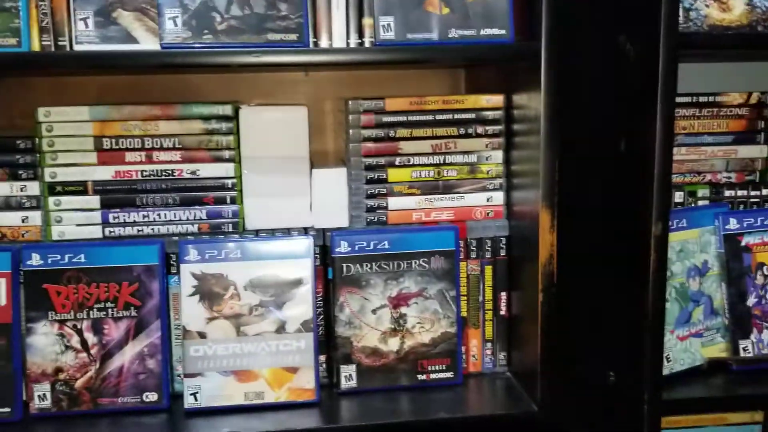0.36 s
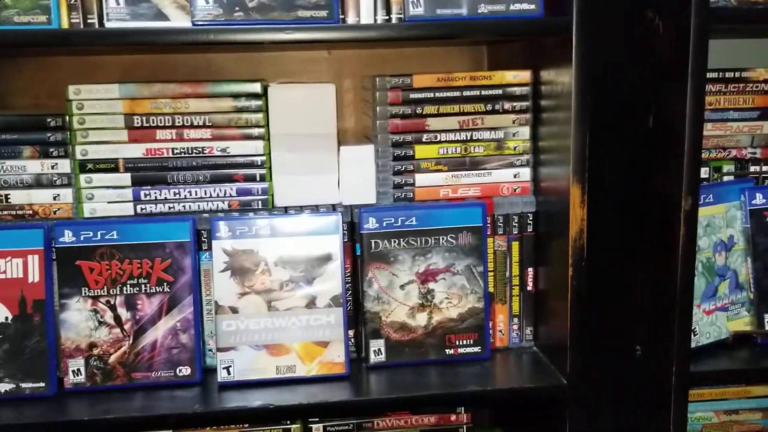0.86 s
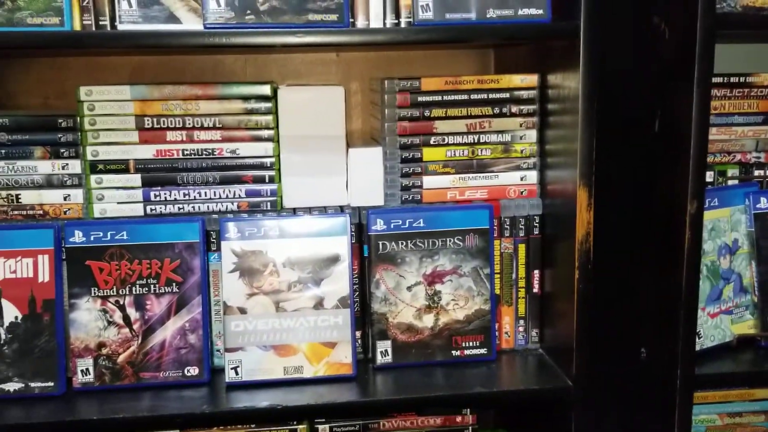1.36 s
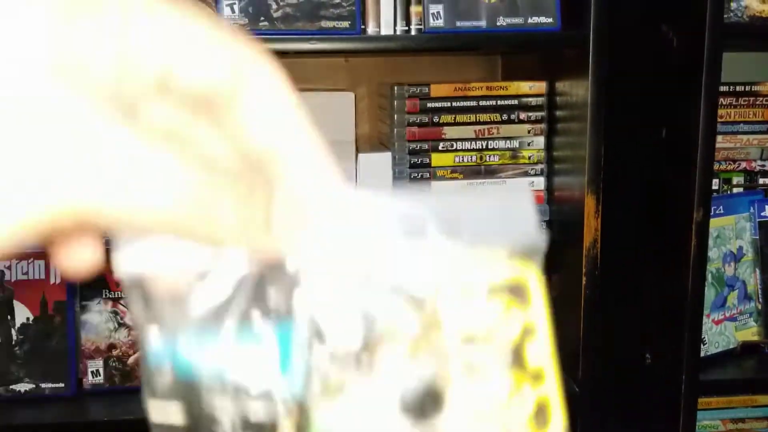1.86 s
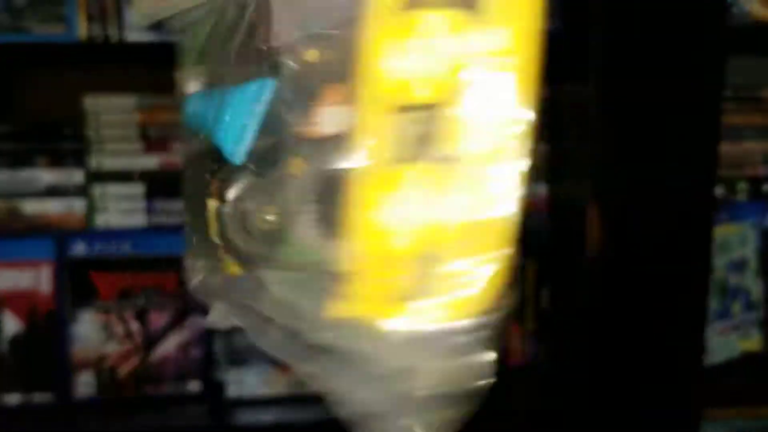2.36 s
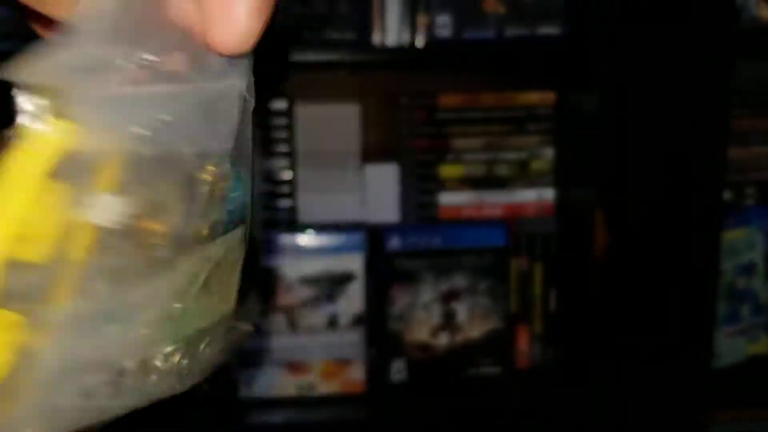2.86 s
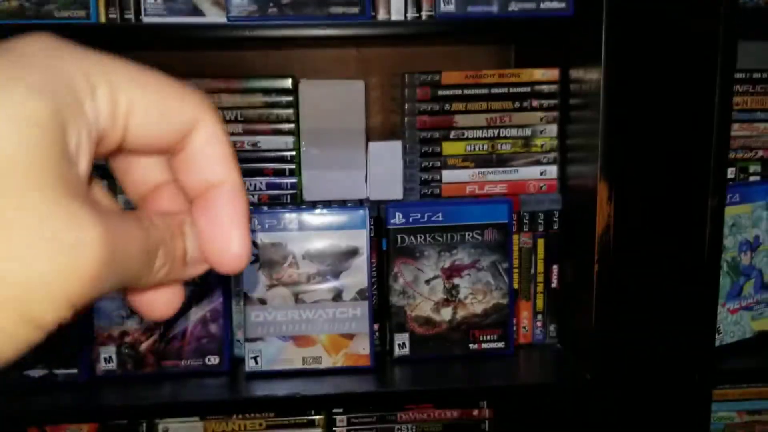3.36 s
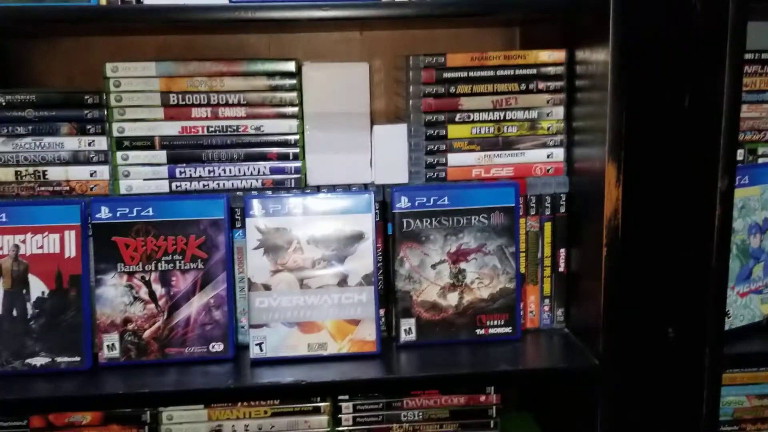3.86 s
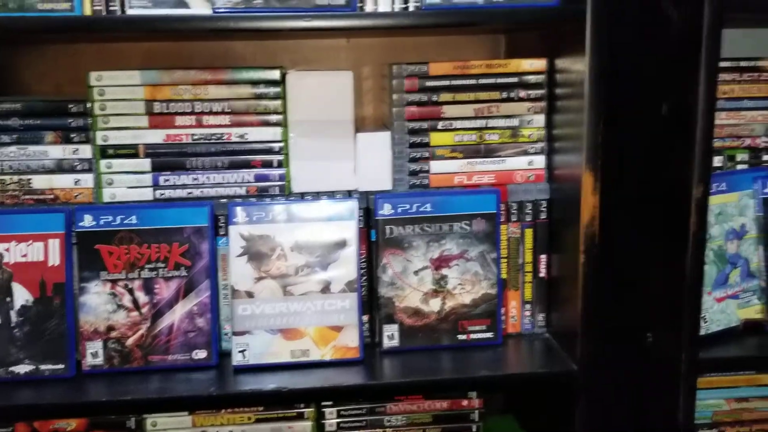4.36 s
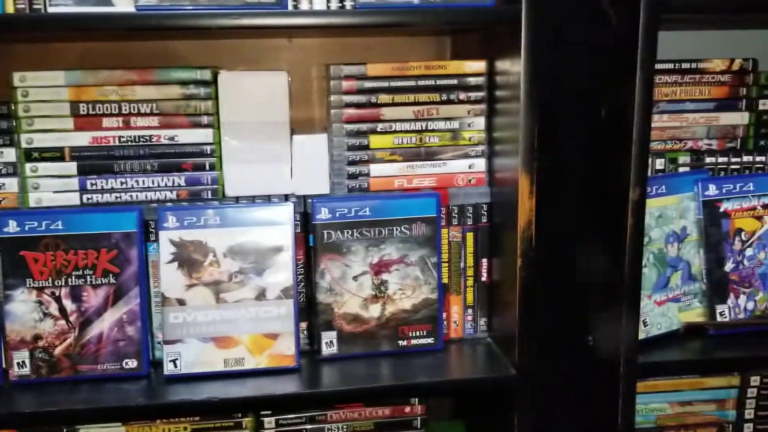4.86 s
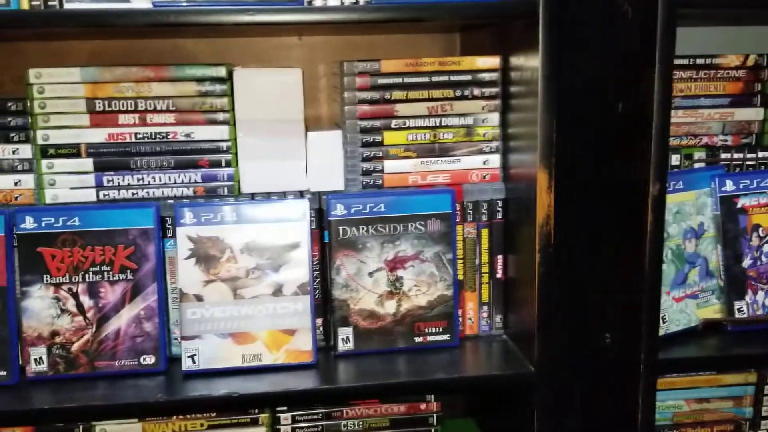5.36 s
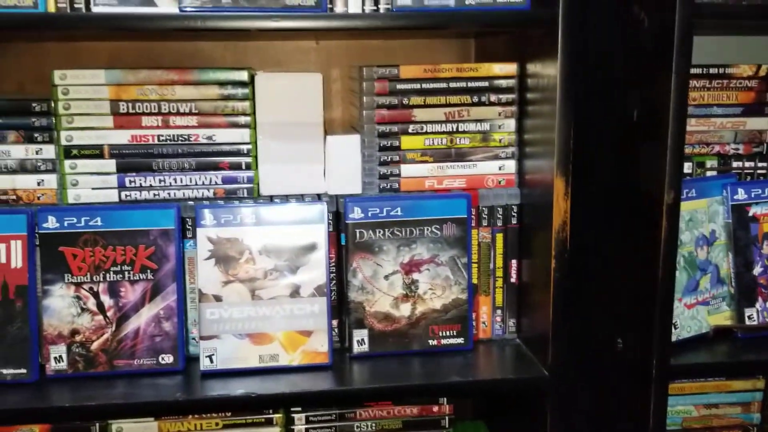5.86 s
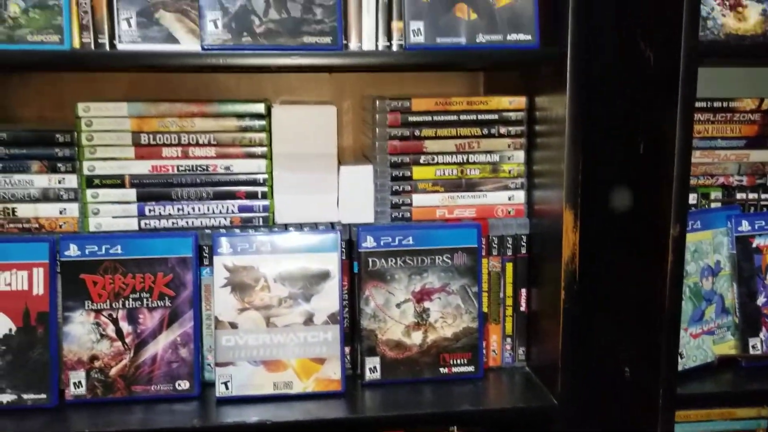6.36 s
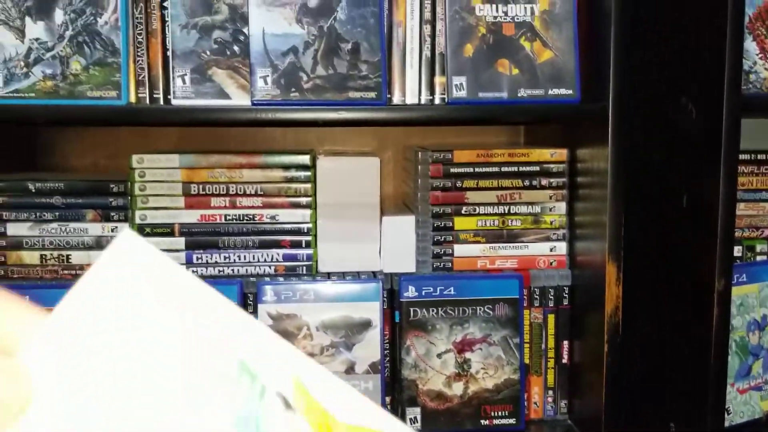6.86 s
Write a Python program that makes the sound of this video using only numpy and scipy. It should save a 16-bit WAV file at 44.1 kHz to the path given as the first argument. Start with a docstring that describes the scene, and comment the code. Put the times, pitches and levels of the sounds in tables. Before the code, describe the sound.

Close stereo pickup in a quiet, slightly live room with low rumble and faint hiss. A plastic bag of small hard parts lands with a crunch, then fingers crease it in crackling clumps and sharp snaps. After sparser crinkles it is dropped with a very loud knock, handled again with another thump, and ends in faint sliding rustle. Soft low bumps come through the stand.

```python
"""Room rumble, a faint hum and microphone hiss, all shaped noise and sines, open the scene; soft bumps
on the stand join as falling or rising swings. Hands then turn and squeeze a small plastic bag of parts:
the film creases in clumps of tiny noise cracks, sheets rustle over each other, parts knock on a table
as damped modes, and single folds snap as short noise bursts. A two-port microphone hears the bag move
from side to side in a quiet room, whose walls answer with sparse decaying taps."""
import sys
import numpy as np
from scipy import signal
from scipy.fft import rfft, irfft
from scipy.io import wavfile
from scipy.ndimage import uniform_filter1d

SR = 44100
rng = np.random.default_rng(int(sys.argv[2]) if len(sys.argv) > 2 else 0)


def persist_wave(psi):
    """Save psi, clipped to +-1, as 16-bit WAV."""
    counts = np.round(np.clip(psi, -1, 1) * 32767).astype(np.int16)
    wavfile.write(sys.argv[1], SR, np.atleast_2d(counts).T)


def amplitude_ratio(level_db):
    """Convert a level in decibels to the matching linear amplitude (field) ratio."""
    exponent = np.asarray(level_db, float) / 20
    return 10 ** exponent


N = 307377

# colour of hiss and rumble: (frequency [Hz], relative density [dB per Hz])
AIR_COLOUR = [(15, -41.5), (25, -17), (92, -3.5), (180, -19), (344, -31), (405, -26.5), (439, -41),
              (476, -30), (659, -42), (1750, -30), (2150, -31.5), (2600, -33.5), (3160, -46), (4490, -37.5),
              (6560, -56.5), (10000, -53.5), (16000, -37)]
# likeness of the two ports in the air noise: (frequency [Hz], correlation [-1 to 1])
PORT_LIKENESS = [(60, 0.79), (240, 0.74), (950, -0.56), (3770, 0.57), (15000, 1)]
# swell of the rumble: (time [s], level over RUMBLE_DB [dB])
RUMBLE_SWELL = [(0, 10), (1.2, 7), (2.4, 8), (2.9, 11), (3.4, 8), (3.6, 4), (4.2, 6), (5.5, 5.5), (6.3, 9),
                (6.97, 5.5)]
# steady hum: (frequency [Hz], rms level [dB])
HUM_TONES = [(240, -82.5), (481, -84)]
# hands bumping the stand: (time [s], starting level [dB], starting pitch [Hz], left over right [dB])
STAND_BUMPS = [(0.0243, -41, 81.4, -5), (0.233, -37, 83, 0.5), (.357, -38, 155, 1), (0.6652, -40, 130, -11),
               (0.7115, -34, 227, 0), (.8535, -43, 74, -8), (1.635, -40, 167, -13), (2.274, -44.5, 162, 12),
               (2.6998, -49, 110, -19), (2.761, -45.5, 63, -16), (2.9353, -37, 180, 5),
               (2.9868, -29, 178, -5), (3.0297, -34, 117, -4), (3.138, -41.5, 103.3, -9.5),
               (3.185, -34.5, 139, -7), (3.22, -33, 110, 5), (3.327, -35, 138.3, -2.5),
               (3.7666, -45.5, 81, -17.5), (3.8367, -37, 138, -5), (3.9127, -43, 69.6, -3),
               (4.7247, -46.5, 86.2, -11.5), (4.82, -42, 182, -6.5), (5.22, -50, 178.7, -1.5),
               (6.25, -37, 123, -5), (6.415, -44.5, 76, -8.5), (6.4893, -43.5, 60.2, -4.5)]
# where the bag is: (time [s], lag of the left port [samples], left over right [dB])
BAG_PLACE = [(0.298, 6.5, -1.5), (0.698, -2.5, -2.5), (1.9, -2.5, -1.5), (2.301, -15.5, 8.5),
             (2.8, -4.5, 4), (3.2, -3, 0), (4.399, -2, -2), (4.802, 12, -1), (5.3, 12.5, -0.8),
             (5.699, -2, 0), (6.1, -6.5, -1.5), (6.799, -12.5, -1)]
# the bag landing or being slapped: (start [s], hold after the rise [s], small creases [dB],
# treble against creases [dB], weight of the contents [dB])
BAG_DROPS = [(.218, 0.033, -26, -0.5, -5.5), (.378, 0.01, -38.5, -0.5, -9.5),
             (3.204, 0.0025, -18.5, -8.5, -7.5), (3.28, .01, -42, -5.5, -23),
             (3.822, 0.039, -48.5, -12, 4.5), (4.8, .05, -32.5, 1.5, -1.5),
             (4.99, 0.019, -43.5, -3.5, -5.5), (5.149, 0.058, -58.5, -7.5, 4.5)]
# fingers working the film: (start of hold [s], hold [s], small creases [dB],
# treble against creases [dB], weight of the contents [dB])
FILM_GRIPS = [(.5, 0.026, -73.5, -7, -6.5), (.71, 0.017, -60, -12, 6.5), (.785, 0.019, -50, -9.5, -16),
              (.85, .01, -45.5, -5, -16), (.906, 0.058, -47.5, -7.5, -29), (1, 0.056, -53.5, -8.5, -24),
              (1.143, 0.048, -46, -8.5, -38.5), (1.25, 0.017, -42.5, -11.5, -15.5),
              (1.395, 0.04, -64.5, -11, -4), (1.68, 0.021, -60.5, -3.5, 0.5), (1.758, 0.06, -60, -5.5, -4),
              (2.275, 0.0067, -56.5, -7.5, 5.5), (2.45, 0.0034, -57, -4.5, -1), (2.5, 0.13, -62, -7.5, 2),
              (2.73, 0.017, -54.5, -5.5, -3.5), (2.84, 0.039, -68, 5.5, 8.5), (2.935, 0.018, -52, -4, 6.5),
              (3.92, 0.06, -50.5, -6.5, -37), (4.06, 0.08, -47, -10, -20), (4.15, 0.074, -52, -9, -9.5),
              (4.36, 0.053, -60, -9, -12.5), (4.52, 0.029, -66.5, -0.5, -13), (4.667, 0.07, -60, -5, -17.5),
              (4.92, 0.018, -44, -2, -9)]
# film sliding over film: (start of hold [s], hold [s], rustle [dB],
# treble against rustle [dB], weight of the contents [dB])
FILM_SLIDES = [(5.3, 0.04, -57, -2, -16.5), (5.39, 0.14, -50.5, -8.5, -20), (5.6, 0.04, -66, 6, 1),
               (5.67, .14, -55.5, 2.5, -22), (5.84, 0.089, -57, 1.5, -20), (6.07, 0.099, -65, 6.5, -20.5),
               (6.27, 0.31, -65.5, 4.5, -9.5), (6.65, 0.18, -72.5, -2, -4)]
# colour of worked film: (frequency [Hz], relative gain [dB])
WORKED_COLOUR = [(290, -50), (500, -32), (688, -27), (750, -1), (1030, 1), (1570, 0.5), (2850, -1),
                 (4870, -5), (6140, -17), (9090, -16), (12700, -8.5), (16000, -24)]
# colour of sliding film: (frequency [Hz], relative gain [dB])
SLIDING_COLOUR = [(170, -24), (290, -27), (413, -8), (607, -22), (767, -4.5), (1380, -1.5), (2790, 0),
                  (3470, -7), (4940, -7.5), (6150, -22.5), (16000, -12.5)]
# parts knocking on the table: (time [s], level [dB], brightness [dB per octave], damping [factor])
PART_KNOCKS = [(.337, -23.5, 6, 0.77), (.378, -19, 0.5, 2.3), (.652, -51, -11, 2.5), (.706, -34, 4.5, 1.2),
               (1.627, -41, 6.5, 1.6), (2.929, -32, -9, 1.8), (2.985, -40, 11.5, 1.4),
               (3.133, -40.5, -22, 1.2), (3.185, -49.5, 5, 1.6), (3.2117, 4.5, 2.5, 2.1),
               (3.219, -17, 2.5, 0.97), (3.2222, -1.5, -5, 1.35), (3.229, -8, -3.5, 1.8),
               (3.294, -23, -12, 1.8), (3.33, -51, 7, 1.8), (3.754, -52, -6, 1.7), (3.831, -9.5, -1, 2.1),
               (5.073, -32, -5, 1.4), (5.153, -23, -0.5, 1.9), (5.22, -34, -1, 1.8), (5.678, -37.5, -3, .9),
               (6.248, -50, -2.5, 1.4)]
# modes of table and hard parts: (frequency [Hz], relative level [dB], t60 at damping 1 [s])
TABLE_MODES = [(273, -10, 0.05), (386, 3.5, 0.043), (508, -2, .08), (674, -9.5, 0.15), (803, 1, 0.064),
               (901, 0.5, 0.089), (987, -4.5, 0.12), (1060, -5.5, 0.054), (1110, -11, 0.031),
               (1414, -4, 0.016), (1860, -9.5, 0.061), (2210, -5, 0.038), (3030, -11.5, .03)]
# single folds snapping: (time [s], peak [dB], pitch [Hz], relative treble [dB])
FOLD_SNAPS = [(.3836, -16, 2910, -4), (.7802, -30.5, 2160, -24), (.84, -27, 2590, -21),
              (0.8438, -29, 2960, -13), (.8566, -23, 2970, -11), (.86, -25.5, 2760, -19),
              (0.881, -32.5, 3930, -11), (0.8936, -24.5, 2910, -9), (.9018, -25.5, 3000, -10),
              (.909, -29, 3000, -10), (.9197, -26, 2900, -18), (0.949, -36, 2940, -22),
              (.972, -31.5, 2960, -1), (1.0286, -36.5, 3800, -13), (1.0578, -37, 2680, 4),
              (1.131, -28.5, 2860, -7), (1.1541, -31.5, 3060, 1), (1.2047, -32, 4800, -6),
              (1.242, -44, 1060, -20), (1.2586, -33, 1200, -26), (1.2725, -32, 1970, -21),
              (1.2824, -25, 5010, -10), (1.311, -35.5, 1190, -28), (1.386, -44, 2470, -33),
              (1.3973, -43.5, 2700, -28), (1.426, -41.5, 2530, -11), (1.6773, -50, 2800, -13),
              (1.744, -35, 2670, -30), (1.7593, -27, 2240, -13), (2.2568, -37.5, 3960, -27),
              (2.2696, -30.5, 1800, -29), (2.3012, -38, 3020, -7), (2.382, -41.5, 1860, -28),
              (2.434, -40.5, 1720, -24), (2.4577, -33.5, 1620, -14), (2.4934, -37, 1630, -33),
              (2.5126, -31, 2550, -18), (2.5639, -29.5, 2240, -34), (2.612, -43.5, 1300, -10),
              (2.6231, -31, 1310, -7), (2.6918, -34.5, 2400, -16), (2.7244, -32, 2210, -4),
              (2.73, -35.5, 2200, -14), (2.8779, -25, 2850, -3), (2.9282, -34.5, 2340, -11.5),
              (2.9727, -29, 2300, -6), (2.9831, -28.5, 1870, -8), (2.9947, -31, 4640, -12),
              (3.2949, -27.5, 3160, -28.5), (3.8313, -29.5, 2360, -40), (3.9716, -42, 2640, -19),
              (3.9925, -28.5, 4200, -8.5), (4.0394, -41, 4260, -34), (4.0803, -28, 2750, -14),
              (4.123, -37, 1850, -10), (4.1481, -36, 1200, -16), (4.176, -36, 1080, -28),
              (4.207, -33.5, 3330, -13), (4.2298, -34, 1300, -6), (4.357, -41.5, 2800, -37),
              (4.371, -36, 2285, -33.5), (4.4593, -41.5, 2340, -16.5), (4.507, -43, 1700, -16),
              (4.5396, -33, 3770, -1.5), (4.661, -37.5, 2810, -13.5), (4.9162, -26, 4620, -8),
              (4.994, -28, 2760, 2), (5.1536, -31, 2710, -36.5), (5.281, -37.5, 1220, -6),
              (5.3133, -29, 2390, -2.5), (5.3941, -39.5, 2890, -23), (5.465, -43, 2700, -22),
              (5.479, -35, 2460, -29), (5.557, -37, 2800, -9.5), (5.8, -42, 2560, -19),
              (6.675, -50.5, 3920, -11)]
# reverberation of the room: (frequency [Hz], t60 [s], relative level [dB])
WALL_DECAY = [(99.6, 0.37, -13), (300, 0.43, -12.5), (1000, 0.23, -9.5), (3000, 0.085, -7),
              (10000, 0.14, -7.5)]

AIR_DB, RUMBLE_DB = -59, -68.5  # air: rms before its bass is cut; rumble: base of its swell
STAND_HZ = 64
DROP_RISE_S, DROP_FALL_DB_PER_S = 0.01, 340.5
GRIP_RISE_DB_PER_S, GRIP_FALL_DB_PER_S = 325, 190.5
SLIDE_RISE_DB_PER_S, SLIDE_FALL_DB_PER_S = 208, 198
DROP_FOLDS_DB, GRIP_FOLDS_DB, SLIDE_FOLDS_DB = -2.5, -1, -3  # large folds against small creases
FOLDS_PER_WEIGHT = 0.34  # dB per dB: large folds sound more as the contents pull on the bag
CONTENTS_DB = -4.5  # added to every weight
CRUSH_FROM_DB, CRUSH_SPAN_DB = -48.5, 13.5
MODE_SPREAD_DB = 1.5
EDGE_HZ, ABOVE_EDGE_DB = 15900, -31


def evened(x):
    """Scales to rms 1."""
    return x / np.sqrt(np.mean(x ** 2) + 1e-20)


def read(points, hz):
    """Reads a spectrum table on a log-frequency axis."""
    f, value = np.transpose(points)
    return np.interp(np.log(hz + 1), np.log(f + 1), value)


def band(x, lo_hz, hi_hz, order=2):
    """Causal band-pass."""
    return signal.sosfilt(signal.butter(order, [lo_hz, hi_hz], "band", fs=SR, output="sos"), x)


def add(mix, s, sound):
    """Lays a sound into both ports, with the lag and balance of the bag's place."""
    at, lag, pan_db = np.transpose(BAG_PLACE)
    for port, side in zip(mix, (.5, -.5)):
        start = round(s * SR + side * np.interp(s, at, lag))
        part = port[start:][:len(sound)]
        part += amplitude_ratio(side * np.interp(s, at, pan_db)) * sound[:len(part)]


def quiet_room():
    """Hiss and swelling rumble come from random short-time spectra, the hum from steady sines."""
    frames, hz = N // 512 + 5, np.fft.rfftfreq(2048, 1 / SR)
    a, b, c, d = rng.standard_normal((frames, 1025, 4)).T
    same = np.clip(read(PORT_LIKENESS, hz), -1, 1)[:, None]
    left = a + 1j * b
    right = same * left + np.sqrt(1 - same ** 2) * (c + 1j * d)
    spectra = np.array([left, right]) * amplitude_ratio(read(AIR_COLOUR, hz))[:, None]
    air = evened(signal.istft(spectra, nperseg=2048, noverlap=1536)[1][:, :N])
    t = np.arange(N) / SR
    swell_db = np.interp(t, *np.transpose(RUMBLE_SWELL))
    rumble = amplitude_ratio(RUMBLE_DB + swell_db) * evened(band(air, 30, 130))
    hum = sum(amplitude_ratio(db) * np.sqrt(2) * np.sin(2 * np.pi * f * t) for f, db in HUM_TONES)
    hiss = signal.sosfilt(signal.butter(3, 130, "high", fs=SR, output="sos"), air)
    return amplitude_ratio(AIR_DB) * hiss + rumble + hum


def bumps():
    """A push on the stand swings once and settles near the stand's pitch, detuned in each port."""
    out, t = np.zeros((2, N)), np.arange(6000) / SR
    detune = 1 + .12 * rng.standard_normal((len(STAND_BUMPS), 2))
    for (s, db, hz, pan_db), own_pair in zip(STAND_BUMPS, detune):
        for port, side, own in zip(out, (.5, -.5), own_pair):
            settled = STAND_HZ * own
            pitch = settled + (hz - settled) * np.exp(-t / 0.0036)
            swing = np.sin(2 * np.pi * np.cumsum(pitch) / SR)
            swing *= amplitude_ratio(db + side * pan_db - 60 * t / 0.081)
            part = port[round(s * SR):][:len(t)]
            part += swing[:len(part)]
    return out


def cracks(per_s, spread_db, clump_db, bag_width):
    """Tiny creases at random moments, in clumps; each patch of film has its own sound and spot on the bag."""
    clumps = evened(uniform_filter1d(rng.standard_normal(N), 260))
    size = amplitude_ratio(spread_db * np.minimum(rng.exponential(1, N), 4) + clump_db * clumps)
    size *= rng.random(N) < per_s / SR
    patch, t, out = rng.integers(0, 24, N), np.arange(128) / SR, np.zeros((2, N))
    for k in range(24):
        crease = evened(rng.standard_normal(128) * amplitude_ratio(-60 * t / 0.0033))
        sound = signal.oaconvolve(size * (patch == k), crease)[:N]
        port_lag = round(bag_width * rng.standard_normal())  # samples
        out += [sound, np.roll(sound, port_lag)]
    # the colour drifts at random, alike in both ports
    spectra = signal.stft(out, SR, nperseg=512)[2]
    colour = uniform_filter1d(rng.standard_normal(spectra.shape[1:]), 8, 0)
    colour = uniform_filter1d(colour, 12, 1)
    return signal.istft(spectra * amplitude_ratio(2.7 * evened(colour)), SR, nperseg=512)[1][:, :N]


def effort(rows, t, folds_db, fall_db, rise_db=None):
    """Each row rises, holds and lets go; powers add, for creases, folds, treble and contents."""
    power = np.full((4, len(t)), 1e-14)
    for s, hold, db, treble_db, weight_db in rows:
        if rise_db:
            rise = amplitude_ratio(-rise_db * np.maximum(s - t, 0))
        else:  # a drop starts from silence
            rise = np.clip((t - s) / DROP_RISE_S, 0, 1)
            hold = hold + DROP_RISE_S
        large_folds_db = folds_db + FOLDS_PER_WEIGHT * weight_db
        balance_db = np.array([[0], [large_folds_db], [treble_db], [weight_db + CONTENTS_DB]])
        fall = -fall_db * np.maximum(t - s - hold, 0)
        power += (rise * amplitude_ratio(db + fall + balance_db)) ** 2
    return power


def film(raw, colour, gains):
    """Splits coloured cracks into small creases, large folds and treble, and the raw ones into contents."""
    hz = np.fft.rfftfreq(N, 1 / SR)
    spectrum = rfft(raw) * amplitude_ratio(read(colour, hz))
    low = 1 / (1 + (hz / 1900) ** 8)
    high = 1 - 1 / (1 + (hz / 5750) ** 16)
    creases, folds, fizz = (evened(irfft(spectrum * part, N)) for part in (1 - low - high, low, high))
    contents = evened(band(raw, 215, 720))
    return sum(gain * part for gain, part in zip(gains, (creases, folds, fizz, contents)))


def creasing():
    """Cracks follow the hands: sparse when worked softly, a dense crunch when loud, fine and even in slides."""
    t, steps = np.arange(N) / SR, np.arange(0, N + 32, 32) / SR
    dropped = effort(BAG_DROPS, steps, DROP_FOLDS_DB, DROP_FALL_DB_PER_S)
    gripped = effort(FILM_GRIPS, steps, GRIP_FOLDS_DB, GRIP_FALL_DB_PER_S, GRIP_RISE_DB_PER_S)
    slid = effort(FILM_SLIDES, steps, SLIDE_FOLDS_DB, SLIDE_FALL_DB_PER_S, SLIDE_RISE_DB_PER_S)
    worked_gains, slid_gains = ([np.interp(t, steps, np.sqrt(p)) for p in power]
                                for power in (dropped + gripped, slid))
    # the louder the creasing, the more the crunch replaces single cracks
    crushed = np.clip((20 * np.log10(worked_gains[0]) - CRUSH_FROM_DB) / CRUSH_SPAN_DB, 0, 1)
    picked = evened(cracks(3000, 6.7, 2.2, 3.5))
    crunch = evened(cracks(9000, 4.2, .8, 2.7))
    worked = np.sqrt(1 - crushed) * picked + np.sqrt(crushed) * crunch
    sound = film(worked, WORKED_COLOUR, worked_gains)
    sound += film(cracks(10000, 1.6, .9, 3.8), SLIDING_COLOUR, slid_gains)
    # the bag's place delays and balances the ports
    at, lag, pan_db = np.transpose(BAG_PLACE)
    lag_now = np.interp(t, at, lag)
    heard = [np.round(np.arange(N) - side * lag_now).astype(int) for side in (.5, -.5)]
    half_pan_db = np.interp(t, at, pan_db) / 2
    placed = np.take_along_axis(sound, np.clip(heard, 0, N - 1), 1)
    return amplitude_ratio([half_pan_db, -half_pan_db]) * placed


def knocks():
    """Each blow rings the same table modes in its own mix, under a short dry clack."""
    out, t = np.zeros((2, N)), np.arange(6000) / SR
    hz, mode_db, t60 = np.transpose(TABLE_MODES)[:, :, None]
    mix = rng.standard_normal((len(PART_KNOCKS), len(TABLE_MODES), 1))
    noise = rng.standard_normal((len(PART_KNOCKS), 6000))
    onset = 1 - np.exp(-(t / 0.00064) ** 2)  # the blow builds up through the soft bag
    for (s, db, tilt_db, damping), uneven, rattle in zip(PART_KNOCKS, mix, noise):
        level_db = mode_db + MODE_SPREAD_DB * uneven + tilt_db * np.log2(hz / 700)
        modes = amplitude_ratio(level_db - 60 * t * damping / t60) * np.sin(2 * np.pi * hz * t)
        ring = modes.sum(0)
        ring = ring / abs(ring).max()
        clack = evened(band(rattle, 350, 3000, order=1))
        clack *= amplitude_ratio(-22.0 + 2.1 * tilt_db - 60 * t / 0.021)  # brighter blows clack more
        add(out, s, -amplitude_ratio(db) * (ring + clack) * onset)
    return out


def snaps():
    """A fold flips: a dry wide crack that leans to one pitch, and a bright tick."""
    out, t = np.zeros((2, N)), np.arange(900) / SR
    noise = rng.standard_normal((len(FOLD_SNAPS), 2, 900))
    for (s, db, hz, treble_db), (a, b) in zip(FOLD_SNAPS, noise):
        pitched = evened(band(a, hz / 1.08, hz * 0.95, order=1))
        wide = evened(band(a, 920, 4000))
        crack = (1.02 * pitched + 0.46 * wide) * amplitude_ratio(-60 * t / 0.015) * (1 - np.exp(-t / 0.00012))
        bright = evened(band(b, 6000, 11000)) + 1.3 * evened(band(b, 11000, 16800))
        tick = bright * amplitude_ratio(treble_db + 9.0 - 60 * t / 0.0072)
        snap = crack + tick
        add(out, s, amplitude_ratio(db) * snap / abs(snap).max())
    return out


def walls(x):
    """Sparse taps of random sign, each band dying at its own speed; the bass reaches both ports alike."""
    taps = np.zeros((2, 20000))
    at = np.arange(120, 19960, 20) + rng.integers(0, 20, (2, 992))
    np.put_along_axis(taps, at, rng.choice([-1., 1.], at.shape), 1)
    hz, t, spectra = signal.stft(taps, SR, nperseg=512)
    alike = (1 / (1 + (hz / 350) ** 2))[:, None]
    spectra[1] = alike * spectra[0] + np.sqrt(1 - alike ** 2) * spectra[1]
    f, t60, db = np.transpose(WALL_DECAY)
    t60_here = read(np.c_[f, t60], hz)[:, None]
    level = amplitude_ratio(read(np.c_[f, db], hz))[:, None]
    spectra *= amplitude_ratio(-60 * t / t60_here)
    spectra *= level / np.sqrt(t60_here * 150)  # a longer tail holds more taps
    response = signal.istft(spectra, SR, nperseg=512)[1]
    return signal.oaconvolve(x, response, axes=1)[:, :N]


def scene():
    """Bag and table sound in the room; bumps reach the microphone through the stand."""
    room, stand = quiet_room(), bumps()
    bag = creasing() + knocks() + snaps()
    return bag + walls(bag) + stand + room


def band_limit(x):
    """A steep low-pass at the top of the band."""
    return signal.sosfilt(signal.butter(12, 16990, fs=SR, output="sos"), x)


def record(dry):
    """A linear-phase filter shelves down the top of the band."""
    edge = signal.firwin(511, EDGE_HZ, window=("kaiser", 8), fs=SR)
    low = signal.oaconvolve(dry, edge[None], "same")
    shelved = low + amplitude_ratio(ABOVE_EDGE_DB) * (dry - low)
    return band_limit(shelved)


dry = scene()
out = record(dry)
persist_wave(out)
```